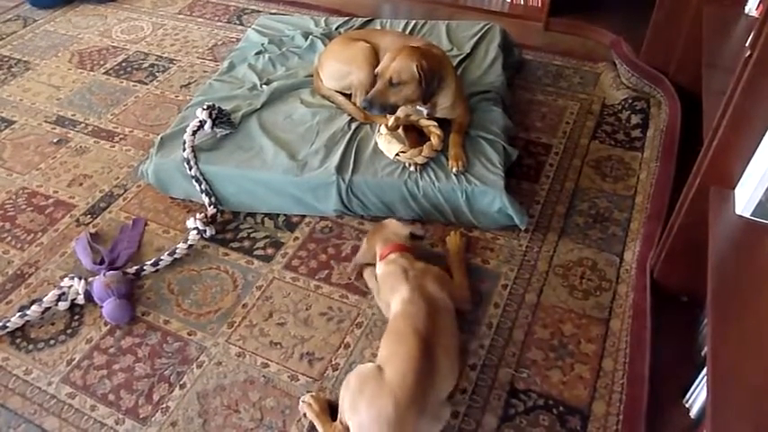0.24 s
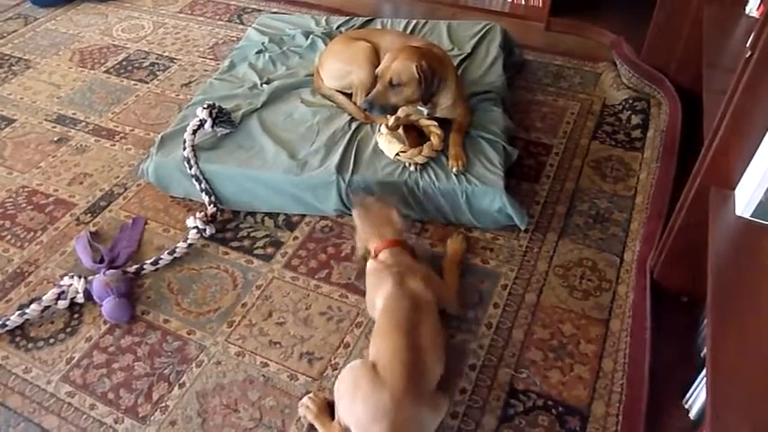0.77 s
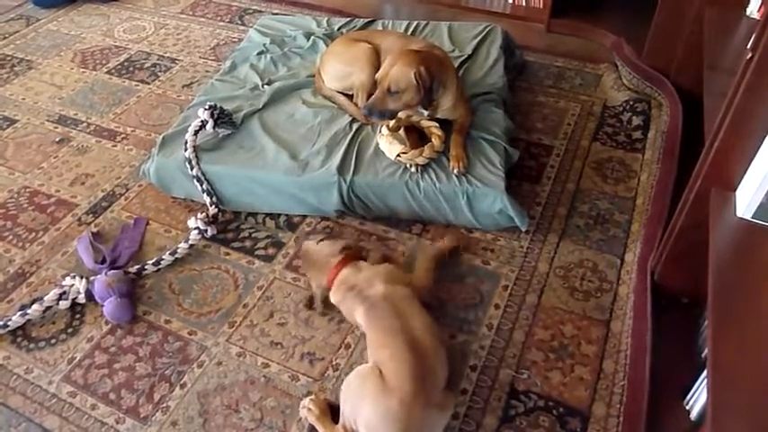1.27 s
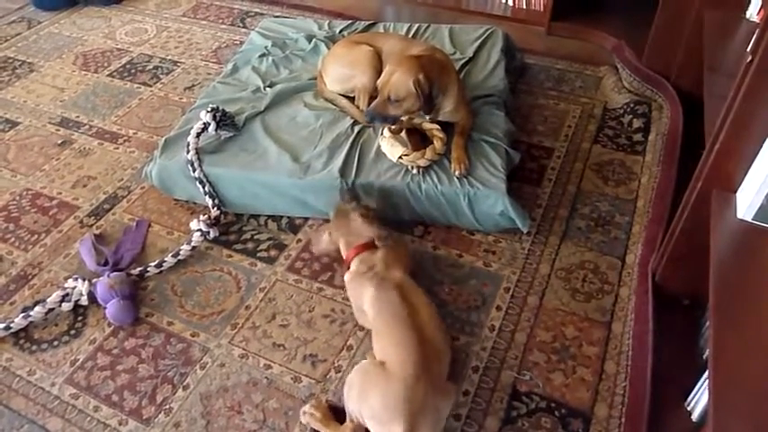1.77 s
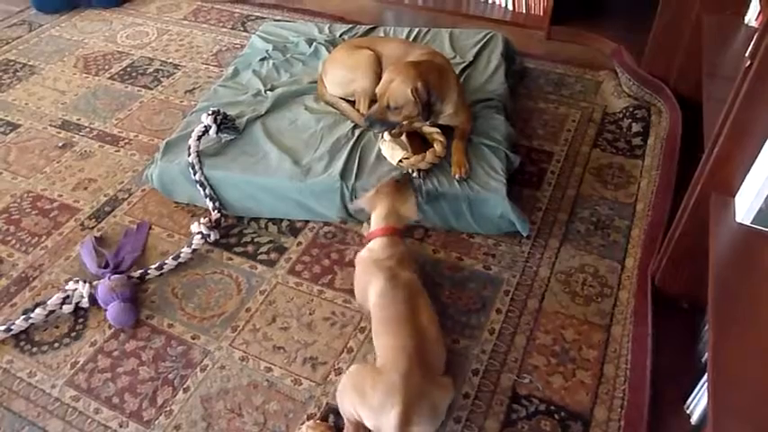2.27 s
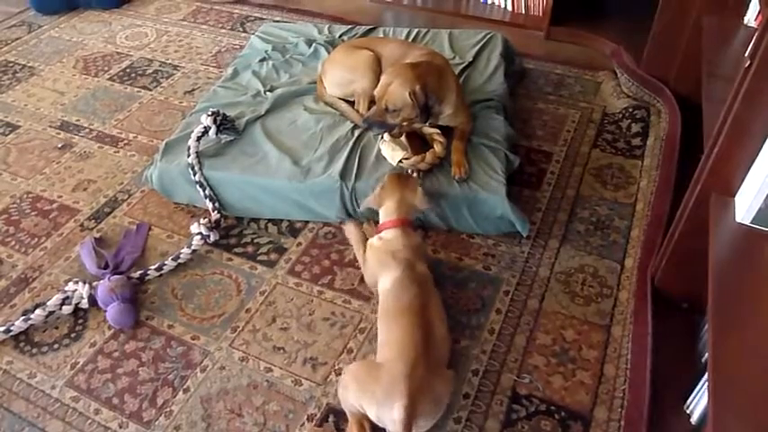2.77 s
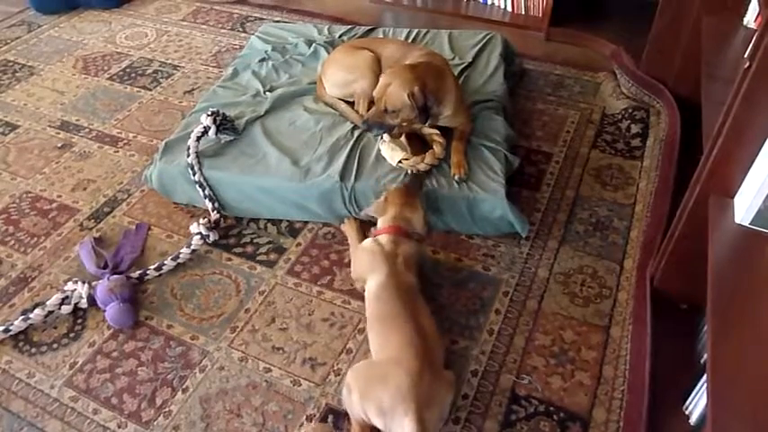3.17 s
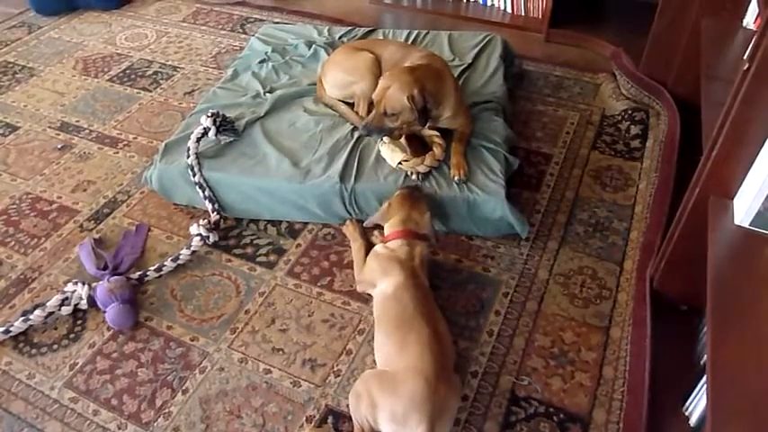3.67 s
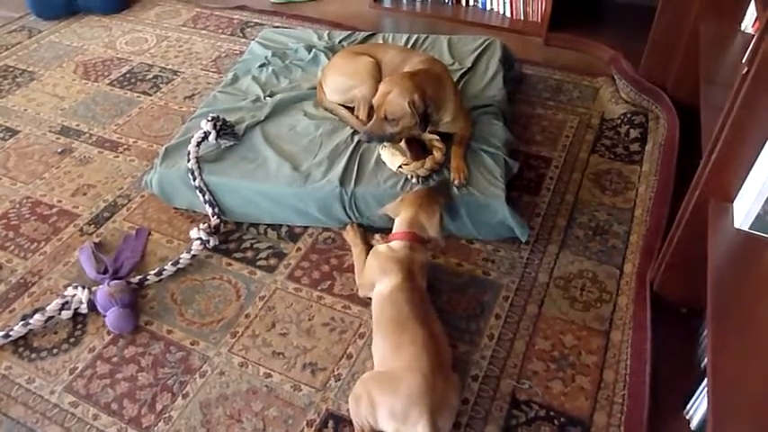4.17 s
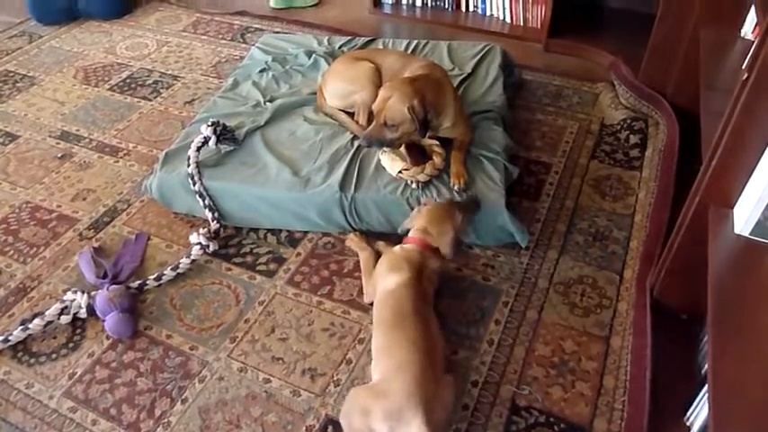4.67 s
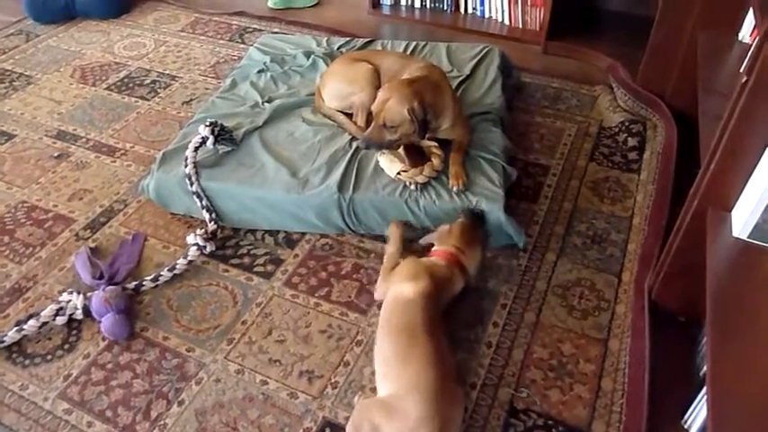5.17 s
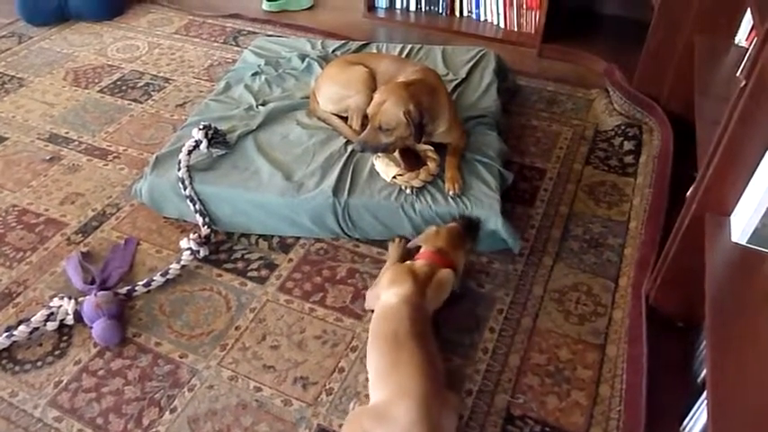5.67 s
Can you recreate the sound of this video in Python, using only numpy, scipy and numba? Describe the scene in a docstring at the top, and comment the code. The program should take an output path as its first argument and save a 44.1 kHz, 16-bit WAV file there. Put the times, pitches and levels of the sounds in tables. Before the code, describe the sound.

A puppy whines, barks and yelps loudly in a lively living room, then quiets to faint nasal whistles and a soft pleading whimper.

```python
"""A low household hum and a soft knock come first, then a puppy begging for an older dog's chew in a living
room: gliding whines, pure yips with barks in a harsh lower register, a yelp into a growl, thin nasal whistles.
Each call is a stack of wavering harmonics plus raspy air, shaped by throat and muzzle; whistles are gliding tones.
Knocks, cloth brushing and household air are coloured noise; the appliance hum is a few sines. The room rings
after each call, and a limiter ducks the loud ones and slowly recovers."""
import sys
import numpy as np
from scipy import signal
from scipy.fft import rfft, irfft, next_fast_len
from scipy.io import wavfile
from scipy.ndimage import uniform_filter1d, minimum_filter1d
from numba import njit

SR = 44100
rng = np.random.default_rng(int(sys.argv[2]) if len(sys.argv) > 2 else 0)


def digitize_waveform(pressure):
    """Quantize a signal to 16-bit integers and store it at the path in sys.argv[1].

    Rows of a 2-D input are taken as channels; values are limited to [-1, 1].
    """
    field = np.atleast_2d(pressure).T
    bounded = np.clip(field, -1, 1)
    quanta = np.round(bounded * 32767).astype(np.int16)
    wavfile.write(sys.argv[1], SR, quanta)


N = 261406
T = np.arange(N) / SR
TOP_HZ = 15300  # nothing is kept above this

# Drawn-out calls as curves in time: time_s, pitch_hz, level_db, roughness (0-1)
RISING_WHINE_CURVE = [(.255, 690, -45.5, 0.11), (.28, 696, -17.5, 0.09), (.345, 645, -11.5, 0.07),
                      (.42, 610, -15, 0.06), (.515, 596, -16, 0), (.54, 661, -14.5, 0.12),
                      (.61, 950, 4, 0.13), (.66, 1012, 8.5, 0.14), (.676, 900, 1, 0)]
WHIMPER_CURVE = [(4.622, 998, -46, 0.064), (4.633, 969, -25, .06), (4.648, 975, -28, 0.28),
                 (4.672, 664, -17.5, 0.2), (4.70, 470, -28, 0.31), (4.75, 410, -37.5, 0.93)]
PLEADING_WHINE_CURVE = [(5.045, 862, -49, 0.28), (5.066, 834, -18.5, 0.24), (5.094, 757.6, -14.5, 0.18),
                        (5.166, 742, -21, 0.041), (5.21, 678, -23, 0.051), (5.27, 622, -13.5, 0.14),
                        (5.335, 564.4, -26.5, 0.35), (5.385, 469.5, -25, 0.12), (5.43, 449, -21.5, 0.023),
                        (5.55, 442.5, -26, 0.018), (5.585, 522.4, -27.5, .22), (5.646, 767.7, -13.5, 0.038),
                        (5.70, 594.6, -23, 0.18), (5.80, 513, -41.5, 0.087)]
# A clear upward yelp that drops into a swelling growl: time_s, pitch_hz, level_db, roughness (0-1)
YELP_CURVE = [(1.114, 605, -36, 0.14), (1.126, 633.5, -10.5, 0.14), (1.145, 713.6, -1.5, 0.06),
              (1.176, 786.6, -0.5, .04), (1.203, 819.5, 8, .04), (1.216, 753, -14, .3)]
GROWL_CURVE = [(1.208, 792, -12.5, 0.27), (1.226, 577.4, -12, 0.24), (1.26, 480.6, -14.5, 0.51),
               (1.331, 443, -17.5, 0.35), (1.379, 501.2, -10, 0.2), (1.43, 580.3, -11.5, 1),
               (1.461, 650, -1, 0.51), (1.482, 642, -3.5, 0.45)]
EASY_DB = -13.5  # a pressed call gains overtones above this level

# Yips, short and almost pure squeaks: start_s, length_s, attack_s, pitch_hz, level_db,
# overtones_db (over the fundamental), edge_db (above about 2 kHz), attack_roughness (clipped to 0-1 in use)
YIP_ROWS = [(1.379, .128, .1, 946.6, 2, -19.5, -16, 1.1), (1.907, 0.066, 0.0067, 935.6, -6.5, -13, 10, 0.2),
            (3.144, .039, 0.016, 1104, -1, -12.5, 5, 0.2)]
YIP_SAG = 0.096  # share of its pitch that a yip loses
YIP_RELEASE_S, YIP_FADE_DB = 0.014, 31.5
YIP_ROUGH = 0.049  # roughness once the folds have locked

# Barks, the voice cracked to a harsh register about an octave lower: start_s, length_s, pitch_hz, level_db,
# edge_db (above about 2 kHz, at mid-bark), steadiest_roughness (0-1), overtones_db (over the fundamental),
# fade_db (during the fall)
BARK_ROWS = [(.657, 0.15, 577.2, 1.5, 2.5, 0.23, 24.5, 8.5), (1.479, 0.14, 473.5, -4, 7.5, 0.43, 23.5, 8.5),
             (1.933, .122, 488.9, -2.5, -0.5, 0.16, 24.5, 14.5),
             (3.164, .118, 530.3, -6, 9.5, 0.54, 19.5, 8)]
BARK_END_HZ = 387.5
BARK_CLOSING_DB = 11  # edge lost from start to end as the mouth closes
BARK_STEADY, BARK_STEADY_WIDTH = 0.326, 0.19  # place and width of the steadiest part, shares of the length
BARK_ROUGH = 0.79  # roughness outside the steadiest part
BARK_ATTACK_S, BARK_HOLD = 0.016, 0.47  # the hold is a share of the length; then pitch and level fall

# Relative overtone response of the wide-open throat and muzzle of a yip: overtone_hz, gain_db
OPEN_THROAT = [(400, -23), (800, 29), (1000, -2), (1200, -12), (1500, 14), (1900, -13), (2400, -2),
               (2750, -9.5), (3100, -19), (3500, -23.5), (4100, -43), (5500, -41.5), (8000, -34),
               (15000, -45.5)]
# The half-open mouth of a whine: overtone_hz, gain_db
HALF_OPEN_MOUTH = [(800, 11.5), (1250, 6), (1550, 7), (1820, -20), (2050, -2.5), (2450, -13), (2650, 0),
                   (3050, -27), (3400, -28.5), (4100, -57), (5000, -29), (6500, -43), (9000, -58.5),
                   (15000, -49.5)]
# The closed muzzle that sends the sound through the nose: overtone_hz, gain_db
NASAL_PASSAGE = [(600, 10), (900, 19.5), (1400, 9), (1800, 0.5), (2250, -2.5), (2650, 0.5), (3100, -11),
                 (3400, -10), (3650, -7), (4050, -43), (4700, -10.5), (5300, -32), (6300, -14.5),
                 (7500, -29.5), (10000, -34.5), (15000, -36)]
# Relative spectrum of turbulent air in the harsh register: frequency_hz, gain_db
MOUTH_RASP = [(250, -39.5), (500, -2.5), (850, 3.5), (1500, 4.5), (1950, -0.5), (2500, 0.5), (3400, -10.5),
              (4200, -38.5), (7000, -22.5), (10000, -40), (14000, -38)]
# The same through the nose: frequency_hz, gain_db
NOSE_RASP = [(250, -48), (500, -4), (900, 5.5), (1500, -5), (2600, -2), (3500, -4.5), (4300, -13),
             (6200, -6), (8000, -19), (14000, -41)]
CHEST_HZ = 390  # so small an animal radiates almost nothing below this

# Nasal whistles: start_s, length_s, start_hz, end_hz, level_db
WHISTLE_ROWS = [(0.238, 0.07, 6240, 6610, -47), (3.038, 0.075, 6860, 6450, -47.5),
                (3.639, 0.073, 6300, 6600, -49), (3.689, 0.062, 6250, 6420, -40.5),
                (3.776, 0.048, 6350, 6260, -67), (4.387, 0.023, 6720, 7100, -34),
                (4.399, 0.019, 7120, 6750, -39), (4.571, 0.027, 6700, 6540, -43),
                (4.716, 0.036, 6820, 6910, -40.5), (5.024, 0.033, 6750, 6570, -37),
                (5.791, 0.039, 6280, 6330, -42.5)]

# Soft knocks: start_s, peak_db (before the room)
BUMP_ROWS = [(.035, -30), (3.769, -27)]
# Fur and paws brushing the bed cover: start_s, length_s, level_db (nominal, before the swell)
BRUSH_ROWS = [(-.15, 0.41, -61.5), (2.68, .42, -61.5), (4.2, 0.64, -61), (5.3, 1, -74)]
# Relative spectrum of the rubbed cloth: frequency_hz, gain_db
CLOTH_SPECTRUM = [(500, -13), (1500, 5.5), (4000, 3), (7000, -2), (11000, -2), (15000, -22)]
FIDGET_DB = -69  # faint rubbing that never stops

# Relative spectrum of the household background: frequency_hz, gain_db
AIR_SPECTRUM = [(15, -54.5), (25, -28), (45, -0.5), (118, -6), (264, -5.5), (309, -10.5), (344, -10),
                (621, -12), (1000, -19), (1120, -21), (1210, -22), (1500, -23.5), (3090, -26.5),
                (12800, -38.5), (15000, -42)]
# Slow course of the background level: time_s, level_db
BACKGROUND_LEVEL = [(0, -45.5), (1.2, -39), (2.5, -53), (3.1, -46), (4.1, -48), (4.7, -43), (5.93, -44)]
# Appliance tones: tone_hz, level_db (relative to the background level)
HUM_TONES = [(58, -20.5), (120, -6.5), (172.3, -12.5), (263.8, -23.5), (341, -12.5)]
HUM_WAVER_DB = 1.5

# Decay of the room by band: centre_hz, reverberation_s, level_db (relative to the direct sound)
ROOM_BANDS = [(150, 0.5, -19.5), (480, 0.59, -3), (705, 0.62, -6.5), (1080, 0.71, -1.5), (1440, 0.72, -3.5),
              (2520, 0.66, -4.5), (4100, 0.72, -1.5), (6950, 0.43, -3), (14000, 0.32, -12)]
# Narrow room resonances that ring on: resonance_hz, reverberation_s, peak_gain_db
ROOM_RINGS = [(873, 0.19, -1.5), (987, 1, -10), (1483, 0.6, -8), (1730, 0.63, -13.5), (2305, 0.97, -4),
              (2855, 0.54, 0.5)]
# Stereo width of diffuse sound: frequency_hz, side_db (relative to mid)
STEREO_WIDTH = [(50, -17), (600, -15.5), (1100, -14), (2200, -5), (4500, -2.5), (9000, 0)]


def undb(db):
    """Decibels to gain."""
    return 10 ** (np.asarray(db) / 20)


def unit(x):
    """Scale to rms 1."""
    return x / np.sqrt(np.mean(x ** 2))


def ramp(x):
    """Rise from 0 to 1 and stay there."""
    return np.clip(x, 0, 1)


def during(start, end):
    """The sample times of one sound."""
    return T[(T >= start) & (T <= end)]


def curve(rows, t):
    """Each column of a table, joined by straight lines in time."""
    s, *columns = np.transpose(rows)
    return [np.interp(t, np.sort(s), c) for c in columns]


def at(points, hz):
    """Read (Hz, value) points on a log-frequency axis."""
    f, value = np.transpose(points)
    return np.interp(np.log(np.maximum(hz, 1)), np.log(f), value)


def colour(x, points):
    """Filter by a spectrum of (Hz, dB) points."""
    n = next_fast_len(len(x))
    gain = undb(at(points, np.fft.rfftfreq(n, 1 / SR)))
    return irfft(rfft(x, n) * gain, n)[:len(x)]


def noise(n, points):
    """Coloured noise of rms 1."""
    return unit(colour(rng.standard_normal(n), points))


def walk(t, rate):
    """Random wander with a spread near 1, turning rate times a second."""
    knots = np.arange(t[0], t[-1] + 1 / rate, 1 / rate)
    return np.interp(t, knots, rng.standard_normal(N // 10)[:len(knots)])


def diffuse(mid, side):
    """Two close microphones hear the same bass and ever less alike treble."""
    side = colour(side, STEREO_WIDTH)
    return np.array([mid + side, mid - side])


def cry(controls, throat, turbulence, jitter=0.053, shimmer=0.55, quaver=0.0095, wobble=0.0082,
        patchy_db=1.5, rasp_db=-2, pulsing=0.36, hoarse=0.57, fray=0, count=26):
    """Vocal folds sound a stack of harmonics through the throat; strain makes them uneven and raspy."""
    t, hz, level_db, overtone_db, edge_db, rough = controls
    span = (T >= t[0]) & (T <= t[-1])
    rough = np.clip(rough, 0, 1)
    unsteady = rough * (jitter * walk(t, 600) + wobble * walk(t, 40)) + quaver * walk(t, 69.9)
    hz = hz * (1 + unsteady)
    phase = 2 * np.pi * np.cumsum(hz) / SR
    k = np.arange(2, count + 1)[:, None]
    overtone_hz = k * hz
    # bared teeth and an open mouth lift the upper resonance
    edge = edge_db * at([(1600, 0.091), (2200, 0.85), (3500, 0.96), (5000, 0.0015)], overtone_hz)
    # tongue and jaw never hold still, so each overtone waxes and wanes
    patchy = patchy_db * np.array([walk(t, 18.54) for _ in k])
    gains = undb(at(throat, overtone_hz) + edge + patchy) * (overtone_hz < TOP_HZ)
    # the highest overtones lose their lock and turn hoarse; in a breaking voice all of them fray
    looseness = hoarse * at([(2500, 0.034), (5000, 0.21)], overtone_hz) + fray * rough
    blur = looseness * np.array([walk(t, 500) for _ in k])
    overtones = (gains * np.sin(k * phase + blur)).sum(0) / np.sqrt((gains ** 2).sum(0))
    share = undb(overtone_db)
    # more overtones change the timbre, not the loudness
    voice = (np.sin(phase) + share * overtones) * np.sqrt(2 / (1 + share ** 2))
    voice *= 1 + shimmer * rough * np.tanh(walk(t, 700))
    # air escapes in puffs, once a cycle
    puffs = 1 + pulsing * np.cos(phase)
    rasp = undb(rasp_db) * rough * noise(len(t), turbulence) * puffs
    soft_ends = np.minimum(1, np.minimum(t - t[0], t[-1] - t) / 0.0036)
    out = np.zeros(N)
    out[span] = (voice + rasp) * undb(level_db) * soft_ends
    return out


def whine(rows, pure_db, knee_hz, rich_db_per_octave, edge_db, strain_db=0, pressing=0,
          opening_db=0, opening_s=0.038):
    """Drawn-out call: purer when high; richer below the knee, strained, pressed or once the mouth opens."""
    t = during(rows[0][0], rows[-1][0])
    hz, level_db, rough = curve(rows, t)
    octaves_below_knee = np.maximum(0, np.log2(knee_hz / hz))
    pressed_db = pressing * np.maximum(0, level_db - EASY_DB)
    closed_db = opening_db * np.exp(-(t - t[0]) / opening_s)
    overtone_db = pure_db + rich_db_per_octave * octaves_below_knee
    overtone_db = overtone_db + strain_db * rough + pressed_db - closed_db
    return t, hz, level_db, overtone_db, edge_db + pressed_db / 2, rough


def yip(start, length, attack_s, hz, db, overtone_db, edge_db, attack_rough):
    """Yip: rough while it swells, then clean as the folds lock, sagging in pitch until it breaks off."""
    t = during(start, start + length)
    age = t - start
    swell = np.sin(np.pi / 2 * ramp(age / attack_s)) ** 2
    release = ramp(1 - (length - age) / YIP_RELEASE_S)
    level_db = db + 20 * np.log10(swell + 1e-3) - YIP_FADE_DB * release
    rough = YIP_ROUGH + attack_rough * (1 - swell ** 8)
    sagging_hz = hz * (1 - YIP_SAG * age / length)
    return t, sagging_hz, level_db, overtone_db, edge_db, rough


def bark(start, length, hz, db, edge_db, steady_rough, overtone_db, fade_db):
    """Bark: it cracks in, steadies on its pitch, then falls and frays as the mouth closes."""
    t = during(start, start + length)
    part = (t - start) / length
    attack = ramp((t - start) / BARK_ATTACK_S)
    fall = ramp((part - BARK_HOLD) / (1 - BARK_HOLD))
    level_db = db + 20 * np.log10(attack + 1e-3) - fade_db * fall ** 2
    steady = np.exp(-((part - BARK_STEADY) / BARK_STEADY_WIDTH) ** 2)
    rough = BARK_ROUGH + (steady_rough - BARK_ROUGH) * steady
    falling_hz = hz + (BARK_END_HZ - hz) * fall
    closing_edge_db = edge_db - BARK_CLOSING_DB * (part - 0.5)
    return t, falling_hz, level_db, overtone_db, closing_edge_db, rough


def puppy_voice():
    """All the calls, without the bass that a small chest cannot radiate."""
    rising = cry(whine(RISING_WHINE_CURVE, pure_db=-18, knee_hz=758, rich_db_per_octave=56, edge_db=0.5,
                       strain_db=7.5, opening_db=33.5),
                 HALF_OPEN_MOUTH, MOUTH_RASP, quaver=0.0032, rasp_db=-5.5, hoarse=1.2, fray=0.97)
    yelp = cry(whine(YELP_CURVE, pure_db=-22, knee_hz=692, rich_db_per_octave=7.5, edge_db=6),
               HALF_OPEN_MOUTH, MOUTH_RASP, quaver=0.0035, hoarse=1.3)
    growl = cry(whine(GROWL_CURVE, pure_db=-5, knee_hz=525, rich_db_per_octave=5.5, edge_db=-15.5,
                      pressing=3.14),
                HALF_OPEN_MOUTH, MOUTH_RASP, quaver=0.0044)
    whimper = cry(whine(WHIMPER_CURVE, pure_db=-16.5, knee_hz=560, rich_db_per_octave=47, edge_db=4),
                  NASAL_PASSAGE, NOSE_RASP, jitter=0.035, shimmer=0.33, rasp_db=-5)
    pleading = cry(whine(PLEADING_WHINE_CURVE, pure_db=-21, knee_hz=683, rich_db_per_octave=36.5,
                         edge_db=8.5, strain_db=10.5),
                   NASAL_PASSAGE, NOSE_RASP, jitter=0.051, quaver=0.0014, wobble=0.07,
                   patchy_db=6.0, rasp_db=-12.5, hoarse=0.22, fray=1.5)
    yips = sum(cry(yip(*row), OPEN_THROAT, MOUTH_RASP, rasp_db=-21.5) for row in YIP_ROWS)
    barks = sum(cry(bark(*row), OPEN_THROAT, MOUTH_RASP, jitter=0.039, shimmer=0.85, quaver=0.011,
                    wobble=0.023, rasp_db=-6) for row in BARK_ROWS)
    chest = signal.butter(6, CHEST_HZ, "highpass", fs=SR, output="sos")
    return signal.sosfilt(chest, rising + yelp + growl + whimper + pleading + yips + barks)


def whistles(waver=0.0058, octave_db=-20, hiss_db=-12):
    """Air squeezed through the nose: a thin tone, its octave and a little hiss."""
    out = np.zeros(N)
    hiss_spectrum = [(2000, -17), (4200, -6.5), (5500, 3.5), (6800, 5), (8000, -26), (14000, -42.5)]
    hiss = undb(hiss_db) * noise(N, hiss_spectrum)
    for start, length, hz_from, hz_to, db in WHISTLE_ROWS:
        span = (T >= start) & (T < start + length)
        t = T[span]
        hz = np.linspace(hz_from, hz_to, len(t)) * (1 + waver * walk(t, 300))
        phase = 2 * np.pi * np.cumsum(hz) / SR
        tone = np.sqrt(2) * (np.sin(phase) + undb(octave_db) * np.sin(2 * phase))
        out[span] += undb(db) * signal.windows.tukey(len(t), 0.6) * (tone + hiss[span])
    return out


def bumps(decay_s=0.0073, size=2048):
    """Dull, short knocks of paws on the carpeted floor: low noise that dies away at once."""
    out = np.zeros(N)
    thud_spectrum = [(100, -18), (450, 10.0), (1000, -2.0), (2000, -14.5), (8000, -48.5)]
    decay = np.exp(-np.arange(size) / SR / decay_s)
    for start, db in BUMP_ROWS:
        knock = noise(size, thud_spectrum) * decay
        out[int(start * SR):][:size] += undb(db) * knock / np.abs(knock).max()
    return out


def brushing(flicker_db=2, taper=0.57):
    """Uneven rubbing of fur on cloth, swelling with each move."""
    size = np.full(N, undb(FIDGET_DB))
    for start, length, db in BRUSH_ROWS:
        to_nearer_end_s = np.minimum(T - start, start + length - T)
        size += undb(db) * ramp(to_nearer_end_s / (taper * length))
    flicker = undb(flicker_db * walk(T, 35))
    return size * flicker * diffuse(noise(N, CLOTH_SPECTRUM), noise(N, CLOTH_SPECTRUM))


def household():
    """Low rumble of the house and the wavering hum of an appliance."""
    air = diffuse(noise(N, AIR_SPECTRUM), noise(N, AIR_SPECTRUM)) * undb(0.5 * walk(T, 6.7))
    hum = np.zeros(N)
    for hz, db in HUM_TONES:
        hum += np.sqrt(2) * undb(db + HUM_WAVER_DB * walk(T, 3)) * np.sin(2 * np.pi * hz * T)
    return (air + hum) * undb(curve(BACKGROUND_LEVEL, T)[0])


def room(x, first_s=0.0035, build_s=0.0021):
    """Direct sound, then wall reflections that thicken and die away band by band, with ringing modes."""
    t = T[:SR]
    f = np.maximum(np.fft.rfftfreq(SR, 1 / SR), 1)
    centres = np.log([row[0] for row in ROOM_BANDS])
    scatter = rfft(rng.standard_normal((2, SR)))
    onset = np.clip((t - first_s) / build_s, 0, 1)
    tail = 0
    # each pick selects one band, crossfading into its neighbours
    for pick, (hz, t60, db) in zip(np.eye(len(ROOM_BANDS)), ROOM_BANDS):
        fade = onset * np.exp(-np.log(1000) * t / t60)
        band = irfft(scatter * np.interp(np.log(f), centres, pick), SR)
        tail = tail + undb(db) * band * fade / np.linalg.norm(fade)
    rings = 0
    for hz, t60, db in ROOM_RINGS:
        decay = np.log(1000) / t60
        ring = np.exp(-decay * t) * np.sin(2 * np.pi * hz * t)
        rings = rings + undb(db) * 2 * decay / SR * ring
    return x + signal.fftconvolve(x[None], diffuse(*tail) + rings, axes=1)[:, :N]


def scene():
    """The puppy's voice and paws in the room, over brushing and the household background."""
    return room(puppy_voice() + whistles() + bumps()) + brushing() + household()


@njit
def follow(size, attack, release):
    """Peak follower: rises quickly, sinks at a steady rate in dB."""
    out, e = np.empty(len(size)), 1e-6
    for i in range(len(size)):
        if size[i] > e:
            e = e + attack * (size[i] - e)
        else:
            e = e * release
        out[i] = e
    return out


def record(dry, ceiling_db=-5, attack_s=0.00033, release_db_per_s=36):
    """A limiter holds loud calls down and lets go slowly; a steep low-pass cuts the top."""
    attack = 1 - np.exp(-1 / (attack_s * SR))
    release = float(undb(-release_db_per_s / SR))
    peak = follow(np.abs(dry).max(0), attack, release)
    gain = np.minimum(1, undb(ceiling_db) / peak)
    # the gain looks a few milliseconds ahead and moves smoothly
    gain = uniform_filter1d(minimum_filter1d(gain, size=161), size=161)
    top_cut = signal.ellip(8, 0.2, 70, TOP_HZ, fs=SR, output="sos")
    return signal.sosfilt(top_cut, dry * gain)


dry = scene()
out = record(dry)
digitize_waveform(out)
```